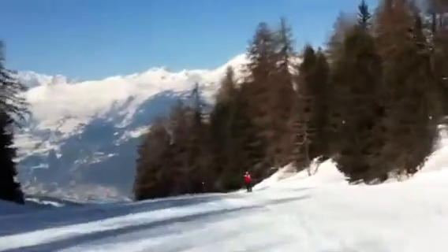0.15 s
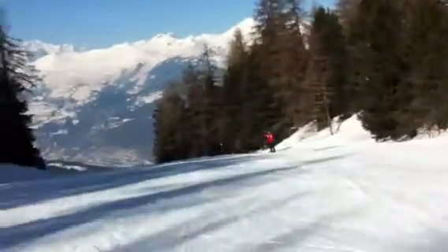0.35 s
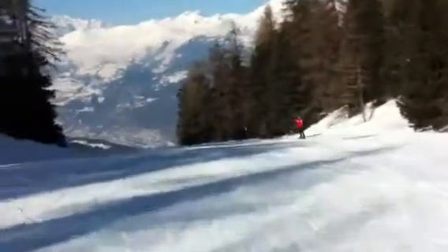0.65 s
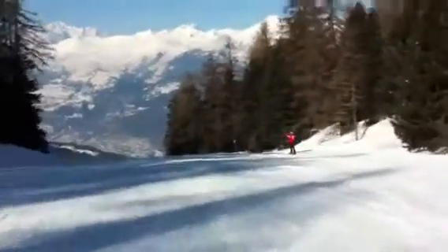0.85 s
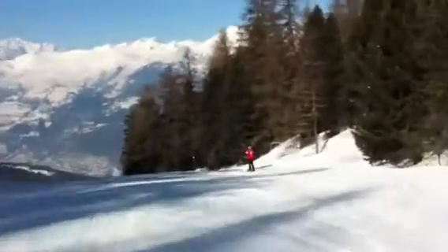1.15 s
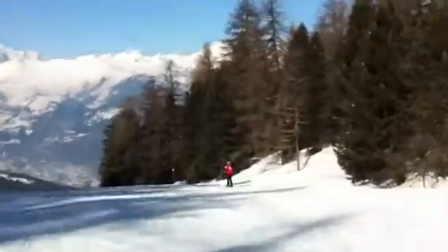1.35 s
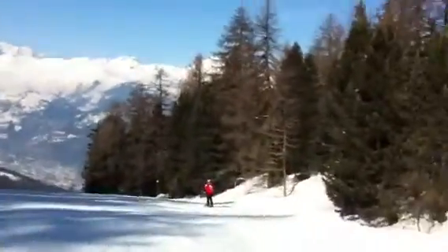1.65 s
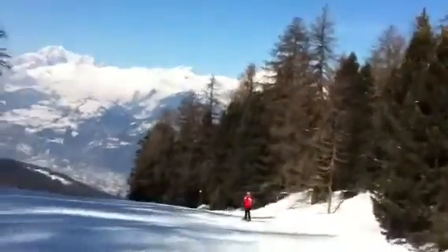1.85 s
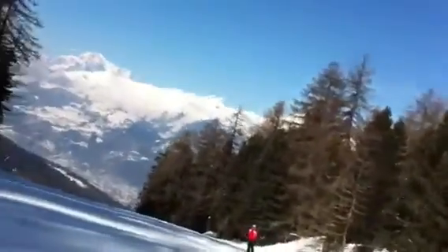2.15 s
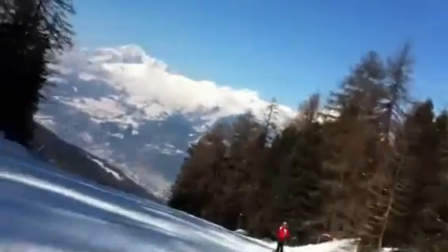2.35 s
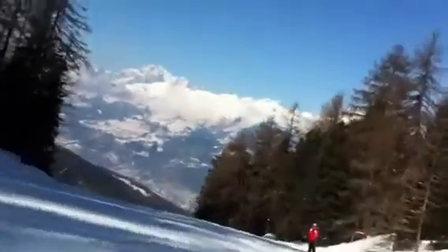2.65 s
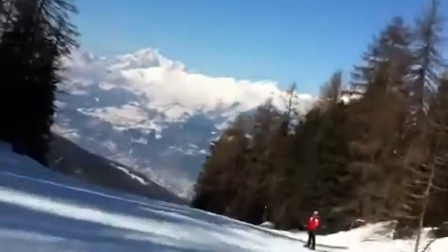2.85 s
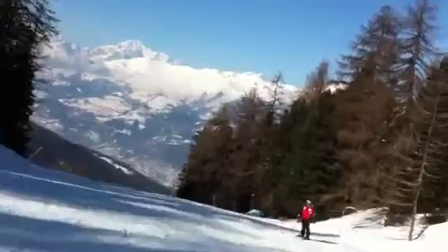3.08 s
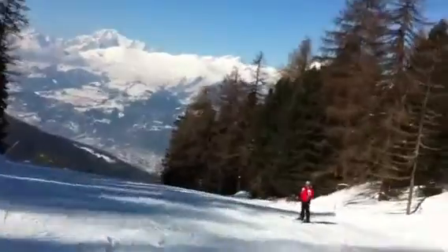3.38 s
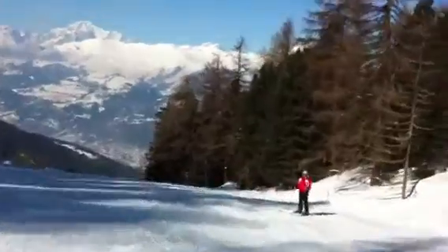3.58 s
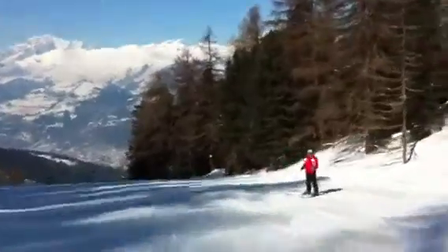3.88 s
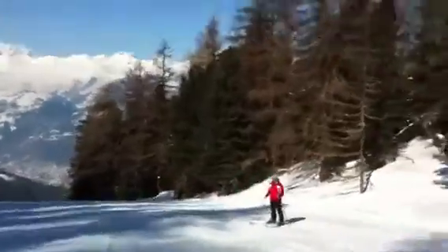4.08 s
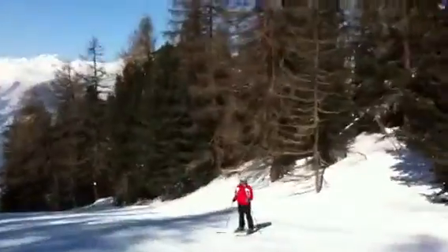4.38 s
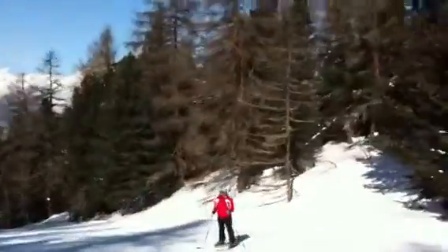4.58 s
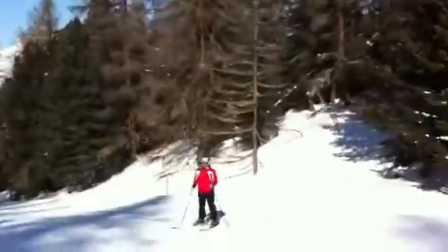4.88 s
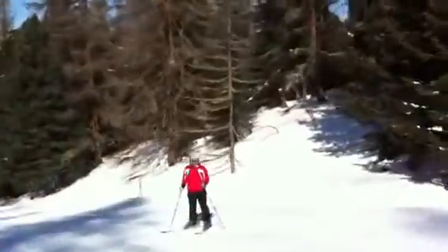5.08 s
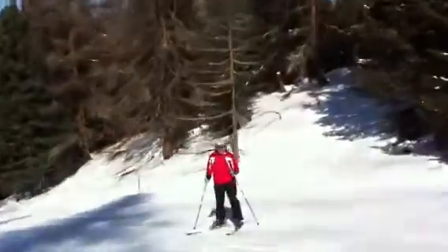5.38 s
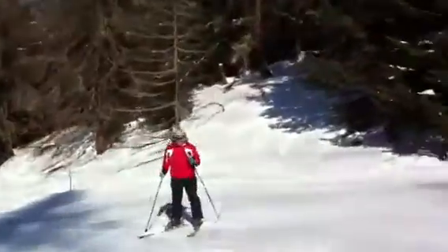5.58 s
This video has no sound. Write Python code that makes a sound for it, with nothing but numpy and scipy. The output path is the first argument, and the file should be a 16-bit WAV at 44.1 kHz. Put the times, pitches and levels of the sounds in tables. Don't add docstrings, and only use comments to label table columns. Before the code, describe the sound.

Skis hiss and scrape over packed snow while wind thumps and flutters hard against a body-worn microphone, with a brief early whistle.

```python
import sys
import numpy as np
from scipy import signal
from scipy.fft import rfft, irfft, next_fast_len
from scipy.io import wavfile
from scipy.ndimage import uniform_filter1d, map_coordinates

SR = 44100
rng = np.random.default_rng(int(sys.argv[2]) if len(sys.argv) > 2 else 0)


def transcribe(u):
    v = np.clip(np.atleast_2d(u).T, -1, 1)
    q = np.round(v * 32767).astype(np.int16)
    wavfile.write(sys.argv[1], SR, q)


def decibels_to_gain(level_db):
    exponent = np.asarray(level_db, float) / 20
    return 10 ** exponent


N = 252648

# (time [s], glide hiss level [dB], edge bite over the hiss [dB])
SKI_RUN = [(0, -45, 5.5), (.06, -42, 3), (.5, -39, 5), (.7, -36.5, 5.5), (1.05, -36.5, 6.5), (1.3, -41, 1),
           (1.75, -48, 5.5), (2.0, -46, -12), (2.2, -44.5, 5.5), (2.8, -42.5, -0.5), (3.13, -42, 5),
           (3.3, -46, 10.5), (3.8, -47, 2.5), (4.3, -45.5, -1.5), (4.77, -42.5, 9), (5.05, -43, 5.5),
           (5.5, -40, 8), (5.73, -43, 9.5)]
# (centre [s], half width [s], load on hiss [dB], edge bite [dB])
RIPPLES = [(.32, 0.033, 4.5, 1), (.4, 0.0079, 3, 0), (.48, 0.028, -2.5, 6), (.8, 0.037, 0.5, 2),
           (.91, 0.074, -1, -0.5), (.99, 0.051, 2, 0.5), (1.2, 0.096, 1, 2), (1.77, 0.0068, -8, 7),
           (1.85, 0.054, -3, -1), (1.96, 0.036, -1.5, 10), (2.04, 0.016, -7, 17), (2.092, 0.027, 1.5, 12.5),
           (2.17, 0.0052, 0, 7.5), (2.31, 0.097, 7.5, 0), (2.54, 0.038, 5.5, 1.5), (2.76, 0.049, 3, -1),
           (2.93, 0.025, 1, 5), (3.17, 0.11, 2, 3), (3.499, 0.076, 3, 0), (3.88, 0.028, -1.5, 3),
           (3.97, 0.069, 2, -2), (4.15, 0.043, -5.5, -1.5), (4.4, 0.052, -2.5, 1.5), (4.5, 0.024, 1, 1),
           (4.61, 0.051, 0, -6.5), (4.86, 0.048, -3, -1), (5.129, 0.082, 3.5, 4), (5.27, 0.095, 8, 0),
           (5.39, 0.026, -1, 1.5), (5.53, 0.11, 1, 2)]
# (frequency [Hz], density [dB per Hz])
HISS_SPECTRUM = [(880, -28), (1500, -6), (3380, -1), (4130, -1.5), (5100, 0.5), (6560, -0.5), (13800, -2.5),
                 (16000, -7.5), (16500, -33)]
# (frequency [Hz], density [dB per Hz])
SPRAY_SPECTRUM = [(1200, -19), (2000, -8), (3000, 1), (4200, -4.5), (6500, -5), (9000, -26)]
# (frequency [Hz], density [dB per Hz])
SCRAPE_SPECTRUM = [(120, -18), (250, 1.5), (400, 3), (600, 0), (900, 0.5), (1250, 1), (1600, -2.5),
                   (1950, -4.5), (2300, -8.5), (4000, -20)]

# (time [s], level [dB])
BUFFET = [(0.0, -36.5), (0.24, -32.5), (0.67, -34), (0.92, -28.5), (1.1, -36), (1.21, -32), (1.53, -40.5),
          (1.72, -37.5), (2.41, -33), (2.55, -28), (2.68, -33), (3.13, -33.5), (3.46, -40), (3.75, -38.5),
          (4.64, -41.5), (5.38, -41), (5.62, -50), (5.73, -36)]
# (frequency [Hz], density [dB per Hz])
RUMBLE_SPECTRUM = [(20, -32), (50, -6), (100, 3.5), (180, 5), (300, -7), (450, -15), (900, -27.5),
                   (1600, -47)]
# (centre [s], peak level [dB], pitch [Hz], width [s])
THUMPS = [(.285, -23.5, 198.7, 0.024), (0.308, -21, 347, 0.01), (0.4, -23, 220, 0.023),
          (0.624, -16, 232, 0.0055), (.745, -14.5, 321.5, .006), (.793, -15, 300.3, 0.0094),
          (0.84, -20.5, 221.7, 0.038), (.977, -13.5, 326, 0.0028), (0.989, -21.5, 268.4, 0.023),
          (1.133, -18, 330.5, 0.0078), (1.216, -18, 237.7, 0.0039), (1.303, -23, 213.5, .007),
          (1.501, -20, 288.6, .02), (1.582, -25.5, 201, 0.01), (2.143, -22.5, 209.7, 0.016),
          (2.34, -21.5, 282, 0.0082), (2.427, -16, 276, 0.013), (2.493, -16.5, 251, 0.0059),
          (2.63, -17, 271, .007), (2.641, -17.5, 305, 0.0033), (2.722, -18, 259, 0.018),
          (2.825, -18.5, 290.3, 0.0039), (3.027, -25, 249, 0.0049), (3.08, -17, 289.7, .006),
          (3.272, -20, 263, 0.013), (3.33, -22, 238, 0.0068), (3.56, -18.5, 236.3, 0.0074),
          (3.588, -22, 276, 0.008), (5.022, -23, 209, 0.0087), (5.209, -21, 405.4, .0064)]
# (centre [s], level [dB], pitch [Hz], half length [s])
FLURRIES = [(0.062, -33, 273.3, .01), (.25, -45, 197, 0.033), (0.341, -31.5, 229, 0.036),
            (0.443, -29, 213, 0.011), (0.557, -36, 237, 0.009), (0.695, -29.5, 311, .035),
            (0.857, -34, 205, 0.007), (0.928, -28.5, 255, 0.016), (1.039, -30, 217.6, 0.031),
            (1.109, -22, 224.4, .015), (1.16, -28, 223, 0.015), (1.39, -35.5, 188, 0.017),
            (1.869, -20.5, 225.3, 0.025), (2.2, -38, 301, 0.022), (2.446, -22, 207.5, 0.015),
            (2.552, -23, 259.6, 0.043), (2.656, -20.5, 272, 0.0096), (2.934, -31.5, 228.8, 0.095),
            (3.043, -27.5, 250, 0.039), (3.156, -27.5, 222.7, 0.0065), (3.354, -25, 260.6, 0.013),
            (3.477, -28.5, 311, 0.036), (3.958, -35, 189, 0.014), (4.099, -32, 211.7, 0.0061),
            (4.399, -35, 236.3, 0.019), (4.592, -35.5, 174, 0.0077), (4.757, -35, 374.5, 0.021),
            (5.285, -33, 409.3, 0.067), (5.507, -32, 438, 0.034), (5.6, -35, 400, 0.028)]

# (time [s], pitch [Hz], level [dB])
WHISTLE_NOTES = [
    [(.015, 990, -40), (.035, 985, -37), (.075, 960, -38), (.1, 1020, -36), (.12, 1085, -36),
     (.14, 1150, -43), (.18, 1350, -44)],
    [(.185, 1400, -44), (.205, 1395, -33), (.24, 1390, -33), (.27, 1350, -32), (.3, 1310, -32),
     (.335, 1230, -33), (.36, 1210, -26), (.39, 1222, -33), (.41, 1230, -44)],
]

# (time [s], peak level [dB], ring pitch [Hz])
CRUST_KNOCKS = [(0.461, -23.5, 1020), (0.673, -21, 1240), (2.043, -36, 870), (2.171, -26, 1060),
                (2.21, -22, 1070), (2.762, -27, 740), (3.635, -30.5, 905), (4.167, -33.5, 1320),
                (4.926, -32, 1050), (5.024, -25.5, 1270), (5.066, -21, 1150), (5.21, -24.5, 900),
                (5.323, -18, 1270), (5.427, -22.5, 710)]

# (centre [s], half width [s], level [dB])
RASPS = [(.463, .008, -34), (.49, .025, -30), (.93, 0.035, -34), (2.215, 0.0052, -38),
         (2.645, 0.013, -36.5), (2.72, 0.023, -35), (3.135, .03, -35.5), (3.21, 0.086, -36),
         (3.83, 0.044, -40), (5.035, .008, -33), (5.072, .01, -43), (5.15, 0.036, -33.5)]
# (frequency [Hz], density [dB per Hz])
RASP_SPECTRUM = [(500, -34), (750, -1), (1050, 5), (1450, -6), (2300, -20.5)]

# (centre [s], low edge [Hz], high edge [Hz], rms level [dB])
FLECKS = [(1.484, 5130, 6370, -56), (1.484, 8900, 10500, -55), (2.53, 5170, 6300, -50),
          (2.597, 4130, 5170, -57), (3.458, 5130, 7000, -51), (3.598, 4600, 5800, -58),
          (5.41, 14400, 15900, -56)]


def unit(x):
    return x / np.sqrt(np.mean(x ** 2) + 1e-20)


def curves(rows):
    s, *columns = np.transpose(rows)
    return [np.interp(np.arange(N) / SR, s, column) for column in columns]


def wobble(rate):
    knots = rng.standard_normal(int(N * rate / SR) + 4)
    return map_coordinates(knots, [np.arange(N) * rate / SR])


def bell(s, width):
    return np.exp(-((np.arange(N) / SR - s) / width) ** 2)


def colour(x, spectrum):
    m = next_fast_len(N + 8192)
    points_hz, points_db = np.transpose(spectrum)
    hz = np.fft.rfftfreq(m, 1 / SR)
    gain = decibels_to_gain(np.interp(np.log(hz + 1), np.log(points_hz + 1), points_db))
    return unit(irfft(rfft(x, m) * gain, m)[:N])


def patchy(patchy_db):
    z = signal.stft(rng.standard_normal(N), nperseg=256)[2]
    field = uniform_filter1d(rng.standard_normal(z.shape), size=5, axis=0)
    field = uniform_filter1d(field, size=8, axis=1)
    noise = signal.istft(z * decibels_to_gain(patchy_db * unit(field)), nperseg=256)[1]
    return unit(noise[:N])


def crystals(count, spread_db):
    when, rarity, side = rng.random((count, 3)).T
    size = decibels_to_gain(-spread_db * np.log(rarity + 0.036)) * np.sign(side - 0.5)
    return unit(np.bincount((when * N).astype(int), size, N))


def band(lo_hz, hi_hz, length):
    sos = signal.butter(2, [lo_hz, hi_hz], "band", fs=SR, output="sos")
    return unit(signal.sosfilt(sos, rng.standard_normal(length)))


def skis():
    hiss_db, scrape_db = curves(SKI_RUN)
    for s, width, load_db, bite_db in RIPPLES:
        bump = bell(s, width)
        hiss_db = hiss_db + load_db * bump
        scrape_db = scrape_db + bite_db * bump
    plume_db = 8.5 * bell(3.26, 0.28)
    spray_db = -11 + 0.74 * scrape_db + plume_db
    chatter = 0.5 * wobble(24.18) + 0.42 * wobble(50)

    hiss = colour(patchy(1) + 0.3 * crystals(count=12000, spread_db=2.5), HISS_SPECTRUM)
    spray = colour(patchy(1.5) + 0.45 * crystals(count=6000, spread_db=3), SPRAY_SPECTRUM)
    scrape = colour(patchy(1.5) + 0.53 * crystals(count=1500, spread_db=5), SCRAPE_SPECTRUM)
    hiss = hiss * decibels_to_gain(1.1 * chatter)
    spray = spray * decibels_to_gain(3.9 * chatter + spray_db)
    scrape = scrape * decibels_to_gain(1.03 * chatter + 1.4 * wobble(30) + scrape_db)
    return decibels_to_gain(hiss_db) * (hiss + spray + scrape)


def thump_shape(t, width):
    skew = np.where(t > 0, 1.5, 0.8)
    return decibels_to_gain(-24 * (t / np.clip(width, 0.004, 0.04) / skew) ** 2)


def flurry_shape(t, half):
    eddies_per_s, scatter_db = 80.2, 5.5
    sizes = map_coordinates(rng.standard_normal(size=32), [(t - t[0]) * eddies_per_s])
    return decibels_to_gain(scatter_db * np.tanh(sizes) - 3.8 * (t / half) ** 4) + 1e-9


def eddy(hz, shape):
    drift = uniform_filter1d(rng.standard_normal(len(shape)), size=90)
    turn = np.cumsum(2 * np.pi * hz / SR * (0.92 + 2.2 * drift))
    swing = np.sin(turn + 0.63 * np.sin(turn))
    ragged = band(0.67 * hz, 1.41 * hz, len(shape))
    ragged = ragged / np.sqrt(np.average(ragged ** 2, weights=shape ** 2))
    edge_db = -19.5 + 6.5 * np.log2(hz / 250)
    edge = decibels_to_gain(edge_db) * band(500, 950, len(shape))
    return shape * (swing + 0.38 * ragged + edge)


def wind():
    buffet_db, = curves(BUFFET)
    lumps = decibels_to_gain(0.5 * wobble(14) + 1.2 * wobble(35))
    reach = SR // 12
    t = np.arange(-reach, reach) / SR
    strikes, stir = np.zeros((2, N + 2 * SR))
    shapes = [thump_shape(t, width) for *_, width in THUMPS]
    shapes += [flurry_shape(t, half) for *_, half in FLURRIES]
    for (s, db, hz, _), shape in zip(THUMPS + FLURRIES, shapes):
        start = SR + round(s * SR) - reach
        strikes[start:start + len(t)] += decibels_to_gain(db - 0.5) * eddy(hz, shape)
        stir[start:start + len(t)] += decibels_to_gain(db - 8.5) * shape
    heave = uniform_filter1d(stir, size=500)[SR:SR + N] + decibels_to_gain(buffet_db + 1.5) * lumps
    return strikes[SR:SR + N] + heave * colour(patchy(2), RUMBLE_SPECTRUM)


def whistle():
    out, t = np.zeros(N), np.arange(N) / SR
    for rows in WHISTLE_NOTES:
        hz, db = curves(rows)
        start, end = rows[0][0], rows[-1][0]
        gate = np.clip(np.minimum(t - start, end - t) / 0.008, 0, 1)
        unsteady = np.clip((hz - 1230) / 100, 0.55, 1)
        flutter_phase = 2 * np.pi * 38 * (t - 0.207) + 0.3 * wobble(27)
        flutter = 1 + 0.47 * unsteady * np.cos(flutter_phase)
        phase = np.cumsum(2 * np.pi * hz / SR * (1 + 0.035 * unsteady * wobble(260)))
        out += gate * decibels_to_gain(db + 2.5) * flutter * np.sin(phase)
    return out


def crust():
    out, t = np.zeros(N + SR), np.arange(SR // 20) / SR
    decay = decibels_to_gain(-60 * t / 0.028)
    for s, db, hz in CRUST_KNOCKS:
        ring = np.sin(2 * np.pi * hz * t)
        crack = 0.5 * band(510, 4700, len(t))
        start = round(s * SR)
        out[start:start + len(t)] += decibels_to_gain(db + 0.5) * decay * (ring + crack)
    return out[:N]


def edge_rasps():
    catch = sum(decibels_to_gain(db) * bell(s, width) for s, width, db in RASPS)
    grit = decibels_to_gain(1.5 * wobble(60))
    rasp = colour(patchy(3.5) + 0.5 * crystals(count=2500, spread_db=4.5), RASP_SPECTRUM)
    return catch * grit * rasp


def flecks():
    length = 2048
    out, fade = np.zeros(N), np.sin(np.pi * np.arange(length) / length)
    hz = np.fft.rfftfreq(length, 1 / SR)
    for s, lo_hz, hi_hz, db in FLECKS:
        noise = irfft(rfft(rng.standard_normal(length)) * (hz > lo_hz) * (hz < hi_hz))
        start = round(s * SR) - length // 2
        out[start:start + length] += decibels_to_gain(db) * fade * unit(noise)
    return np.array([out, -out])


def scene():
    mono = skis() + wind() + whistle() + crust() + edge_rasps()
    return np.array([mono, mono])


def roll_off(x):
    return signal.sosfilt(signal.butter(12, 16780, fs=SR, output="sos"), x)


def record(dry):
    port_hz, top_hz = 121, 15950
    m = next_fast_len(N)
    hz = np.fft.rfftfreq(m, 1 / SR)
    wind_cut = (1j * hz / (1j * hz + port_hz)) ** 3
    x = irfft(rfft(dry, m) * wind_cut * (hz < top_hz), m)[:, :N]
    x = x / (1 + np.abs(x / 0.33) ** 4) ** 0.25
    mix = x + flecks()
    return roll_off(mix)


dry = scene()
out = record(dry)
transcribe(out)
```